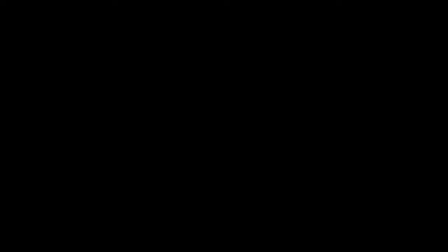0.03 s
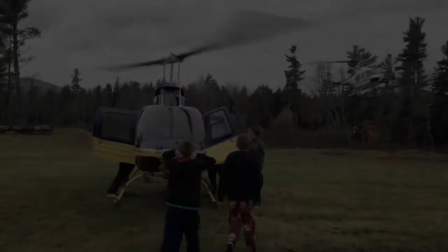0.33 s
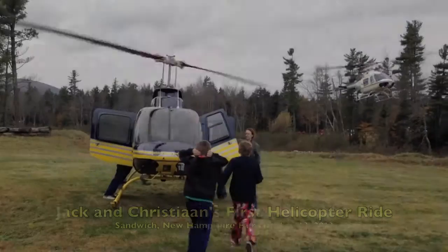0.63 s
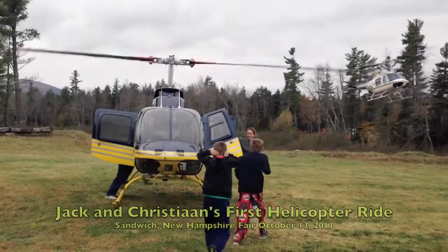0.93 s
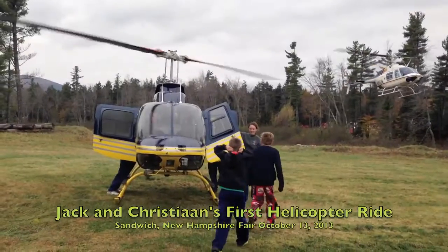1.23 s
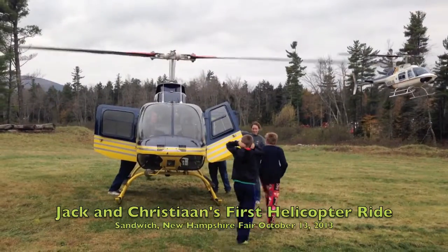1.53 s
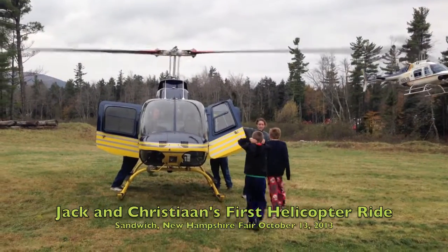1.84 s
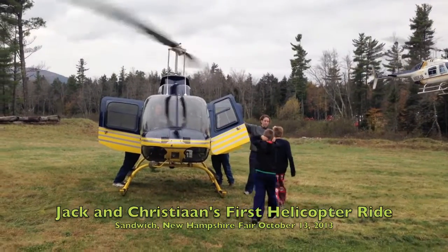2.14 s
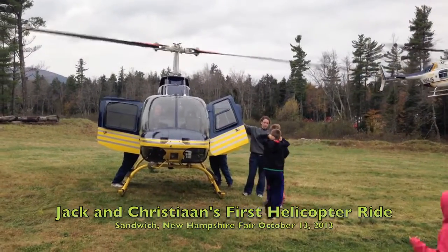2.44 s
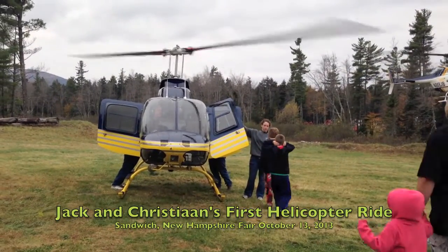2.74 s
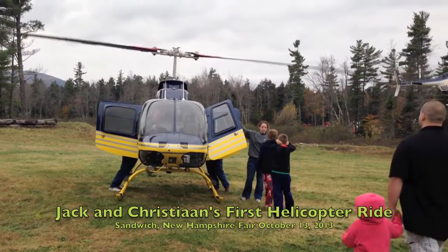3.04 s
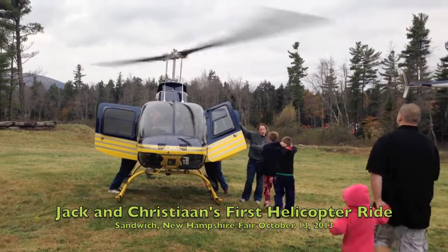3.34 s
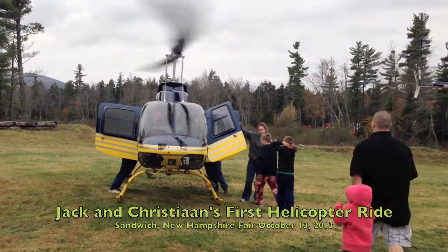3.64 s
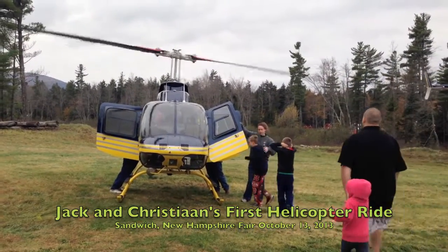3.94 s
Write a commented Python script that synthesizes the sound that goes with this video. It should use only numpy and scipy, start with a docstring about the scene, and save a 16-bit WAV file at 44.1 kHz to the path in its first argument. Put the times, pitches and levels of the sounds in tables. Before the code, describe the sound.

A helicopter roars low over an open field, fading in with slapping blades, occasional sharp cracks and a throbbing, rasping tail rotor. Close to the microphone a second helicopter idles throughout, its turbine whining and blades swishing.

```python
"""A roar of downwash fades in: a light turbine helicopter flies low over a field, behind one idling close by.
The flying one's main blades slap through their wake; its tail rotor hums, throbs and rasps in spells.
The idling one's turbine whines over jet hiss and its tail rotor hums. Its two blades swish,
and one blade tip whistles with a Doppler swoop on every turn."""
import sys
import numpy as np
from scipy import signal
from scipy.fft import rfft, irfft
from scipy.io import wavfile

SR = 44100
rng = np.random.default_rng(int(sys.argv[2]) if len(sys.argv) > 2 else 0)


def store_pcm(level_fs):
    """Save levels as 16-bit WAV."""
    pcm = np.round(np.clip(level_fs, -1, 1) * 32767).astype(np.int16)
    wavfile.write(sys.argv[1], SR, np.atleast_2d(pcm).T)


N = 176400
TIME = np.arange(N) / SR
BIN_HZ = np.arange(N // 2 + 1) * SR / N


def undb(db):
    """Decibels to gain."""
    return 10 ** (np.asarray(db) / 20)


def unit(x):
    """Scale to rms 1."""
    return x / np.sqrt(np.mean(x ** 2))


def curve(rows, at=TIME):
    """Linear interpolation through the rows."""
    return np.interp(at, *np.array(rows, float).T)


def noise():
    """White noise."""
    return rng.standard_normal(N)


def walk(rate_hz):
    """Smooth random drift, rms 1."""
    return unit(irfft(rfft(noise()) * np.exp(-.5 * (BIN_HZ / rate_hz) ** 2), N))


def cycles(hz):
    """Cycles elapsed at a moving rate."""
    return np.cumsum(hz) / SR


def swell(centre_s, length_s):
    """Bell-shaped gain, above one half for length_s."""
    return .5 ** ((2 * (TIME - centre_s) / length_s) ** 2)


def colour(x, spectrum):
    """Minimum-phase filter through (freq_hz, gain_db) rows; output rms 1."""
    hz, db = np.array(spectrum, float).T
    gain_db = np.interp(np.log(np.maximum(BIN_HZ, 1)), np.log(hz), db)
    cepstrum = irfft(np.log(undb(gain_db)), N)
    cepstrum[1:N // 2] *= 2
    cepstrum[N // 2 + 1:] = 0
    return unit(irfft(rfft(x) * np.exp(rfft(cepstrum)), N))


def resonate(x, hz, width_hz):
    """Steep resonance; output rms 1."""
    b, a = signal.iirpeak(hz, hz / (1.55 * width_hz), fs=SR)
    return unit(signal.lfilter(b, a, signal.lfilter(b, a, x)))


def smear(x, corner_hz):
    """Two all-passes spread a sharp pulse into a short swing."""
    warped = np.tan(np.pi * corner_hz / SR)
    a = (warped - 1) / (warped + 1)
    return signal.lfilter([a, 1], [1, a], signal.lfilter([a, 1], [1, a], x))


def hum(phase, harmonics, waver_db, waver_rad):
    """Rotor harmonics wavering in the moving air."""
    out = 0
    for harmonic, db in harmonics:
        gain = undb(waver_db * walk(7))
        angle = 2 * np.pi * (harmonic * phase + rng.random()) + waver_rad * walk(6.6)
        out += undb(db) * unit(gain * np.sin(angle))
    return out


def whine(hz, width_hz, waver_db=2.2):
    """Tone wavering in pitch and level, rms 1."""
    tone = np.sin(2 * np.pi * cycles(hz + .5 * width_hz * walk(width_hz)))
    return unit(tone * undb(waver_db * walk(19)))


# time_s, level_db
ROAR_LEVEL = [(.3, -20), (.9, -23), (1.3, -21.5), (1.7, -21), (1.95, -24), (2.3, -20.5), (2.8, -19.5),
              (3.05, -20), (3.55, -17), (3.8, -22.5), (4, -21.5)]
# freq_hz, gain_db
ROAR_SPECTRUM = [(22, -39), (32, -29), (50, -7), (70, -7.5), (98, -5.5), (135, 0.5), (210, -3.5),
                 (295, 1.5), (410, -7), (560, 0), (730, -4), (950, -10), (1500, -12.5), (2100, -18),
                 (4000, -24), (9000, -33.5)]
# centre_s, length_s, level_db, centre_hz
WHOOSHES = [(0.737, 0.026, -14, 342), (0.956, 0.021, -21, 606), (1.122, 0.037, -24.5, 317),
            (1.29, 0.15, -25, 305), (1.7, .05, -28, 327), (2.048, 0.064, -23.5, 286),
            (2.342, 0.055, -21, 565), (2.568, 0.047, -21, 476), (2.6, .06, -28, 303),
            (2.72, 0.051, -21, 283), (2.816, 0.033, -23, 530), (2.93, .04, -20.5, 290),
            (3.083, 0.025, -23, 450), (3.184, .03, -23, 736), (3.871, .04, -24, 307)]
def downwash(flutter_db=1.5, flicker_db=2):
    """Turbulent roar: flutters as a whole, flickers by octave; whooshes churn through it."""
    octaves = whooshes = 0
    for low_hz in 20 * 2. ** np.arange(10):
        band = signal.butter(2, [low_hz, 2 * low_hz], "band", fs=SR, output="sos")
        octaves += signal.sosfilt(band, noise()) * undb(flicker_db * walk(7.2))
    for centre_s, length_s, db, hz in WHOOSHES:
        whooshes += undb(db) * swell(centre_s, length_s) * resonate(noise(), hz, width_hz=.47 * hz)
    roar = colour(octaves * undb(flutter_db * walk(76)), ROAR_SPECTRUM)
    return undb(curve(ROAR_LEVEL)) * roar + whooshes


# time_s, blade_rate_hz
TAIL_RATE = [(0, 84.6), (1.6, 84.6), (2.8, 84.4), (4, 84.1)]
TAIL_PER_MAIN = 6.443
def geared_rotors(tail_first_s=.0015, slap_first_s=.0505, wander_cycles=.012):
    """Blade passes of the flying rotors, locked by gears; moving air shifts the tail beats a little."""
    rate_hz = curve(TAIL_RATE)
    tail_phase = cycles(rate_hz) - tail_first_s * rate_hz[0] + wander_cycles * walk(6)
    main_phase = (cycles(rate_hz) - slap_first_s * rate_hz[0]) / TAIL_PER_MAIN
    return tail_phase, main_phase


# time_s, level_db
SLAP_LEVEL = [(.3, -27.5), (.7, -24.5), (1, -33.5), (1.5, -27), (2.1, -28.5), (2.45, -26), (2.65, -25),
              (2.9, -24), (3.2, -26), (4, -28.5)]
# freq_hz, gain_db
SLAP_SPECTRUM = [(50, -22), (150, -2.5), (350, 4.5), (650, 0), (1100, -1), (2000, -10.5), (4000, -12.5),
                 (8000, -29), (15000, -25.5)]
def blade_slaps(phase, width_s=.0049, scatter_db=1.2):
    """Each main blade chops through the wake in a burst of its own strength and width."""
    blade = np.round(phase).astype(int) + 1
    offset_s = (phase - np.round(phase)) * TAIL_PER_MAIN / curve(TAIL_RATE)
    strength, stretch = rng.standard_normal((blade.max() + 1, 2))[blade].T
    burst = undb(scatter_db * strength) * np.exp(-np.abs(offset_s) / (width_s * np.exp(.2 * stretch)))
    return undb(curve(SLAP_LEVEL)) * colour(noise() * burst, SLAP_SPECTRUM)


# start_s, level_db, pitch_hz
CRACKS = [(0.345, -5.5, 870), (1.036, -12, 780), (1.4072, -8, 980), (1.4546, -9, 2800), (1.4675, -9, 2600),
          (1.494, -16, 705), (1.845, -8.5, 2250), (2.487, -11, 1900), (2.639, -5, 2410),
          (2.871, -7.5, 1070), (3.019, -20, 1950), (3.099, -17, 1210), (3.231, -4, 1290)]
def blade_cracks(rise_cycles=.65):
    """Now and then a main blade cracks: a few sharp pressure swings."""
    out = 0
    for start_s, db, hz in CRACKS:
        swings = hz * np.maximum(TIME - start_s, 0)
        envelope = swings / rise_cycles * np.exp(1 - swings / rise_cycles)
        out += undb(db) * envelope * np.sin(2 * np.pi * swings)
    return out


# time_s, level_db
RASP_LEVEL = [(.7, -36), (.88, -25), (1.04, -31), (1.14, -24), (1.24, -34), (1.44, -24), (1.53, -28),
              (1.84, -24), (1.88, -30), (2.1, -36), (2.25, -33), (2.52, -34), (2.65, -31), (2.8, -33),
              (3.18, -33), (3.23, -27), (3.32, -26.5), (3.38, -31), (3.47, -29), (3.56, -30), (3.7, -29),
              (3.745, -22.5), (3.82, -33), (3.93, -25), (4, -35)]
# freq_hz, gain_db
RASP_SPECTRUM = [(250, -15.5), (700, -6.5), (1100, -4), (1550, -1.5), (2000, -7.5), (2700, -5), (4000, -10),
                 (6000, -16), (10000, -39), (15000, -41)]
# freq_hz, gain_db
RASP_LATE_SPECTRUM = [(250, -14.5), (750, -0.5), (1050, 1.5), (1550, -2), (2100, -0.5), (2800, -0.5),
                      (4000, -6), (6000, -13.5), (10000, -28), (15000, -24)]
# time_s, late_share; the rasp turns broader, with more fizz on top
RASP_COLOUR_SHIFT = [(1.9, 0), (3.1, 1)]
# centre_s, length_s, level_db, centre_hz
BUZZES = [(0.944, 0.08, -32, 1370), (1.184, 0.021, -30, 1150), (1.422, 0.027, -44, 1290),
          (1.58, 0.088, -41, 1460), (1.714, .07, -36, 1500), (1.847, 0.038, -26.5, 1550),
          (3.235, .035, -24, 1370), (3.31, 0.047, -23.5, 1350), (3.48, 0.025, -29, 1470),
          (3.657, 0.051, -28.5, 1450), (3.757, 0.061, -22.5, 1470)]
def tail_rasp(phase, scatter_db=1.2, decay_s=.0031, puff_db=-1, trim_db=.3):
    """Each flying tail blade gives a snap and a puff; at times the rasp narrows to a hard buzz."""
    blade = np.floor(phase).astype(int) + 1
    strength = undb(scatter_db * rng.standard_normal(blade.max() + 1))[blade]
    snaps = smear(unit(np.diff(blade, prepend=blade[0]) * strength), corner_hz=2390)
    age_s = (phase % 1) / curve(TAIL_RATE)
    puffs = unit(noise() * strength * np.exp(-age_s / decay_s))
    pulses = snaps + undb(puff_db) * puffs
    late = curve(RASP_COLOUR_SHIFT)
    rasp = (1 - late) * colour(pulses, RASP_SPECTRUM) + late * colour(pulses, RASP_LATE_SPECTRUM)
    buzz = sum(undb(db) * swell(centre_s, length_s) * resonate(pulses, hz, width_hz=510)
               for centre_s, length_s, db, hz in BUZZES)
    return undb(trim_db + curve(RASP_LEVEL)) * rasp + buzz


# centre_s, length_s, level_db
THROBS = [(0.274, 0.16, -23.5), (0.533, .05, -24.5), (0.656, 0.099, -24), (0.893, 0.1, -28.5),
          (1.046, 0.12, -25), (1.248, 0.075, -27.5), (1.374, 0.064, -22), (1.503, .09, -29),
          (1.705, .1, -40), (1.84, 0.065, -28), (1.973, 0.059, -27), (2.134, 0.052, -23.5),
          (2.246, 0.05, -23.5), (2.424, 0.064, -26.5), (2.585, 0.077, -27), (2.767, .07, -24),
          (2.937, .12, -24.5), (3.167, 0.05, -27), (3.283, 0.073, -31), (3.37, 0.091, -25.5),
          (3.523, .09, -28.5), (3.616, 0.13, -23.5), (3.79, .07, -31), (3.896, .09, -24.5)]
# harmonic, level_db
FLYING_TAIL_HUM = [(1, -33), (3, -35.5), (4, -39), (5, -38.5), (6, -40), (7, -37), (8, -39), (9, -44),
                   (10, -41)]
def tail_drone(phase):
    """The flying tail rotor hums; its second harmonic throbs unevenly."""
    throbs = sum(undb(db) * swell(centre_s, length_s) for centre_s, length_s, db in THROBS)
    second_harmonic = unit(np.sin(2 * np.pi * 2 * phase + .5 * walk(3.1)))
    return throbs * second_harmonic + hum(phase, FLYING_TAIL_HUM, waver_db=1.5, waver_rad=.86)


# harmonic, level_db
IDLING_TAIL_HUM = [(1, -45), (2, -37), (3, -39.5), (4, -52), (5, -37.5), (6, -38.5)]
def idling_tail_rotor(blade_rate_hz=56.4):
    """Hum of the slow tail rotor."""
    return hum(blade_rate_hz * TIME, IDLING_TAIL_HUM, waver_db=0, waver_rad=.7)


# time_s, level_db
COMPRESSOR_LEVEL = [(.2, -38), (.8, -54), (1.07, -34.5), (1.22, -48), (1.5, -34), (1.75, -45), (1.88, -46),
                    (2.3, -35), (2.5, -46), (2.85, -35.5), (3.02, -53), (3.3, -40), (3.6, -39), (4, -49)]
# time_s, level_db
GEARBOX_LEVEL = [(.3, -46), (.85, -43), (1.2, -40), (1.36, -33), (1.42, -44), (1.48, -30), (1.53, -51),
                 (1.58, -38), (1.69, -42), (1.8, -42), (2.3, -42), (3, -42), (3.54, -37), (3.7, -43),
                 (4, -42)]
# pitch_hz, width_hz
TURBINE_TONES = [(4008, 8), (5723, 35), (8740, 200), (10945, 6), (11810, 110), (12845, 22), (13684, 4)]
# mid_scene_level_db, per tone
TURBINE_LEVELS = [-44, -58, -48.5, -68, -49, -57, -58]
# trend_db_per_s, per tone
TURBINE_TRENDS = [0.5, 5, 0.5, -4, -1, 2.5, 1.5]
# freq_hz, gain_db
HISS_SPECTRUM = [(800, -0.5), (2500, 4.5), (3900, 7), (5000, 1), (7000, -1), (8600, 1.5), (10500, -7),
                 (13000, -6.5), (15500, -20)]
def idling_engine(hiss_db=-29):
    """Turbine tones and rough gearbox ring over jet hiss; the compressor whine swells in the wind."""
    compressor = undb(curve(COMPRESSOR_LEVEL)) * whine(hz=8758, width_hz=4)
    gearbox = undb(curve(GEARBOX_LEVEL)) * whine(hz=4030, width_hz=45)
    turbine = sum(undb(db + trend * (TIME - TIME.mean())) * whine(hz, width_hz)
                  for (hz, width_hz), db, trend in zip(TURBINE_TONES, TURBINE_LEVELS, TURBINE_TRENDS))
    hiss = undb(hiss_db + 1.5 * walk(11)) * colour(noise(), HISS_SPECTRUM)
    return compressor + gearbox + turbine + hiss


def blade_tip(offset_turns, turn_s=.2286, nearest_s=.208, blade_m=4.95, hub_distance_m=13):
    """Position in turns and Doppler factor of a circling tip, as they reach the listener."""
    sent_s = np.arange(-SR, N + SR) / SR
    turn = (sent_s - nearest_s) / turn_s + offset_turns
    towards_m = blade_m * np.cos(2 * np.pi * turn)
    distance_m = np.sqrt(hub_distance_m ** 2 + blade_m ** 2 - 2 * hub_distance_m * towards_m)
    heard_s = sent_s + (distance_m - distance_m.min()) / 343  # speed of sound, m/s
    doppler = 1 / np.gradient(heard_s, sent_s)
    return np.interp(TIME, heard_s, turn) % 1, np.interp(TIME, heard_s, doppler)


# freq_hz, gain_db
SWISH_SPECTRUM = [(150, 1), (500, 17.5), (1500, -1), (3500, -4.5), (7000, -0.5), (10000, 1.5), (13000, 1),
                  (15500, -7)]
def blade_swish(level_db=-33, peak_turn=.93, focus=2.7):
    """Both idling blades swish as they swing towards the listener."""
    beams = 0
    for offset_turns, blade_db in ((0, 0), (.51, -4)):
        turn, _ = blade_tip(offset_turns)
        beams += undb(blade_db) * np.exp(focus * np.cos(2 * np.pi * (turn - peak_turn)))
    return undb(level_db) * unit(colour(noise(), SWISH_SPECTRUM) * beams)


# turns_since_nearest, gain_db
WHISTLE_BEAM = [(0, 7), (.12, 4), (.22, 2.5), (.34, 1), (.46, -1), (.55, 9.5), (.62, 0), (.69, -9),
                (.82, -7), (.92, 5), (1, 7)]
def tip_whistle(level_db=-35.5, pitch_hz=7950, jitter_hz=290):
    """One idling blade tip whistles, with a Doppler swoop on every turn."""
    turn, doppler = blade_tip(0)
    heard_hz = doppler * (pitch_hz + jitter_hz * walk(299.4))
    tone = np.sin(2 * np.pi * cycles(heard_hz))
    flicker_db = 2.4 * walk(41) + 2.7 * walk(340)
    return undb(level_db) * unit(tone * undb(curve(WHISTLE_BEAM, turn) + flicker_db))


def scene():
    """Both helicopters, mono."""
    tail_phase, main_phase = geared_rotors()
    idling = tip_whistle() + blade_swish() + idling_engine() + idling_tail_rotor()
    flying_tail = tail_rasp(tail_phase) + tail_drone(tail_phase)
    flying_main = blade_slaps(main_phase) + blade_cracks() + downwash()
    return (idling + flying_tail + flying_main)[None]


def record(dry):
    """Soft clip, fade-in, low-pass."""
    fade_start_s, fade_s, top_hz = .12, .86, 15250
    fade = np.clip((TIME - fade_start_s) / fade_s, 0, 1) ** 1.16
    lowpass = signal.ellip(12, .1, 90, top_hz, fs=SR, output="sos")
    return signal.sosfilt(lowpass, np.tanh(dry) * fade)


dry = scene()
out = record(dry)
store_pcm(out)
```